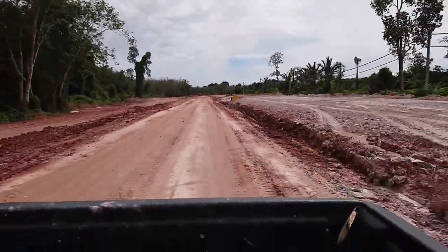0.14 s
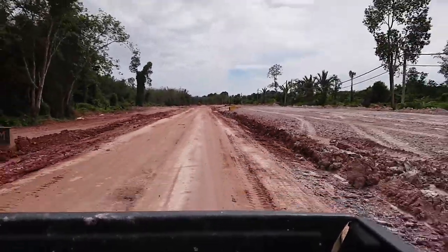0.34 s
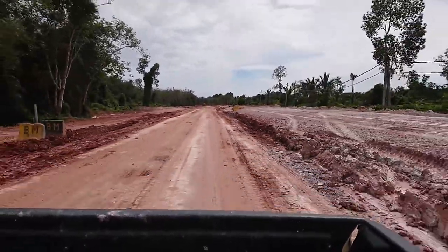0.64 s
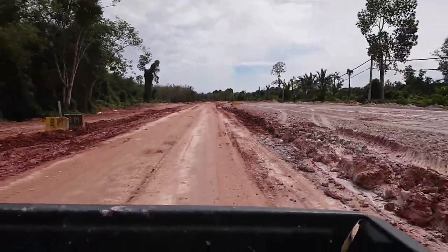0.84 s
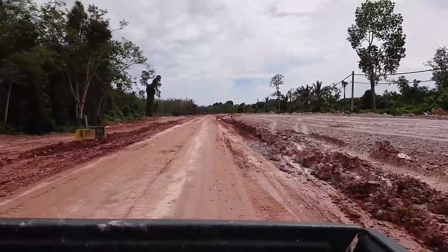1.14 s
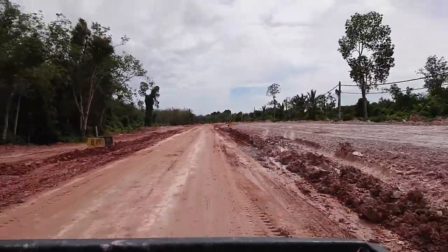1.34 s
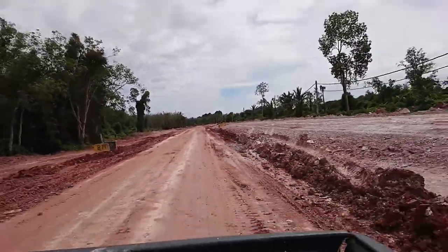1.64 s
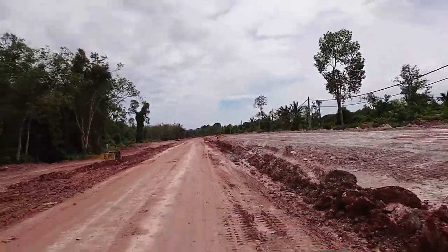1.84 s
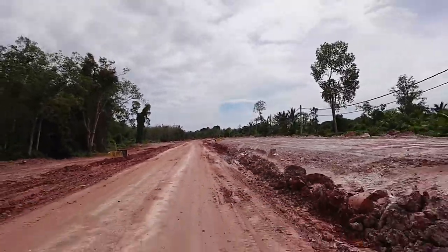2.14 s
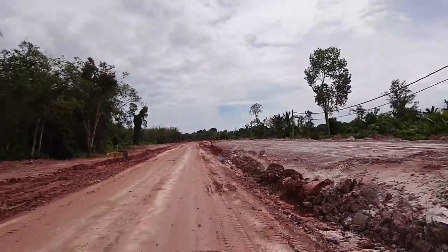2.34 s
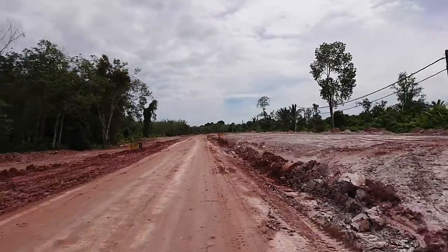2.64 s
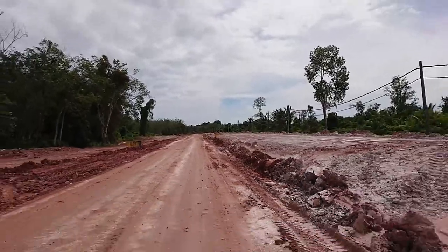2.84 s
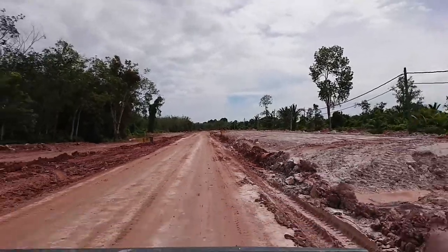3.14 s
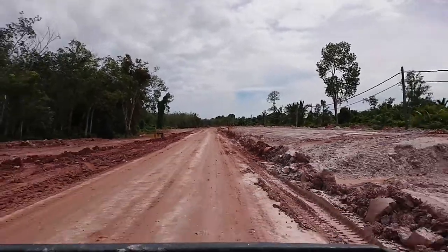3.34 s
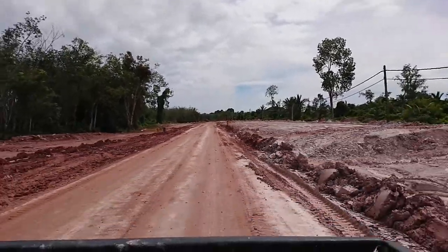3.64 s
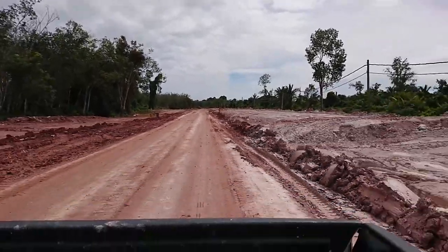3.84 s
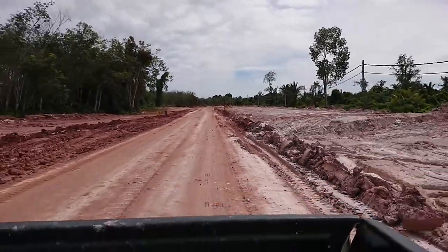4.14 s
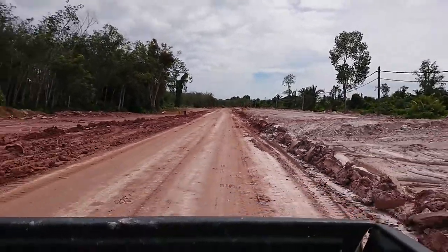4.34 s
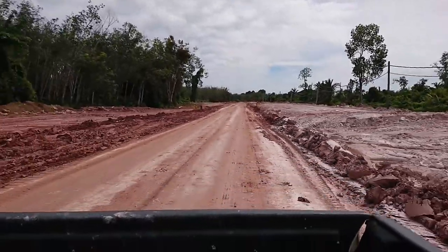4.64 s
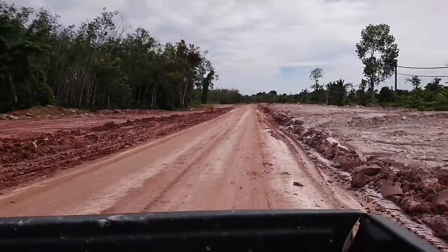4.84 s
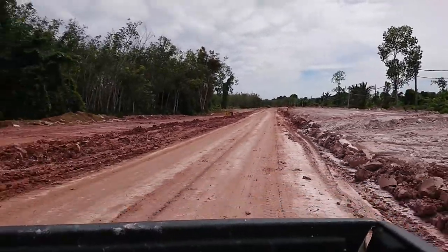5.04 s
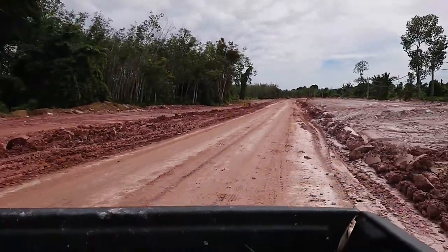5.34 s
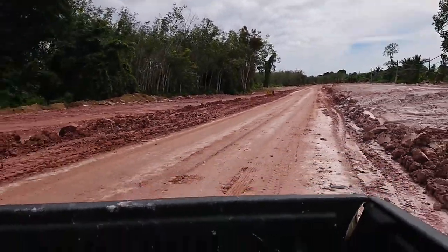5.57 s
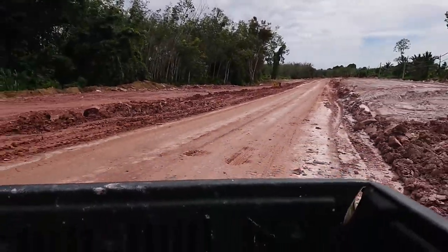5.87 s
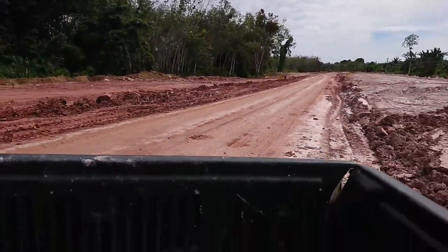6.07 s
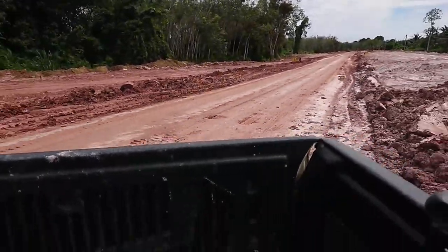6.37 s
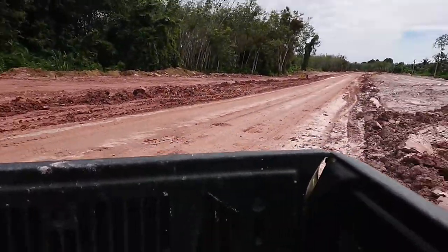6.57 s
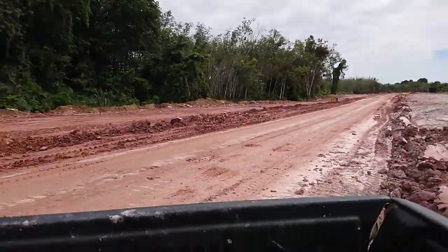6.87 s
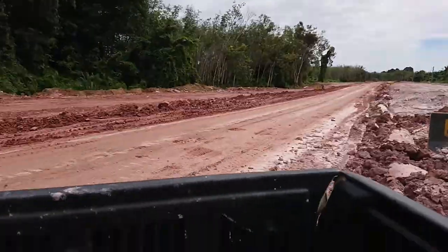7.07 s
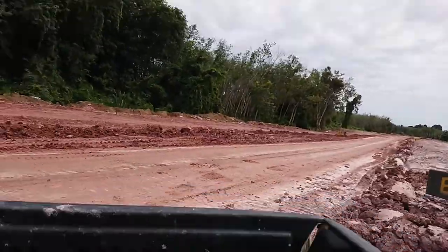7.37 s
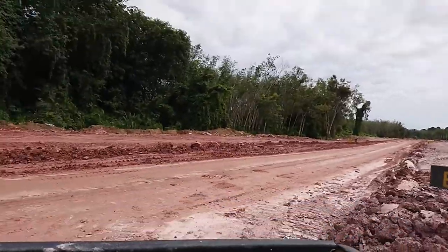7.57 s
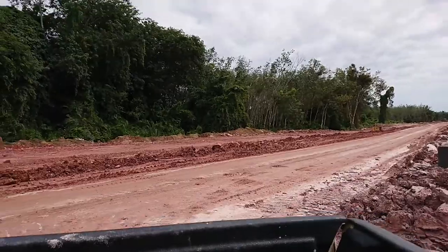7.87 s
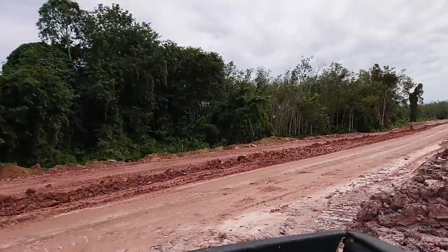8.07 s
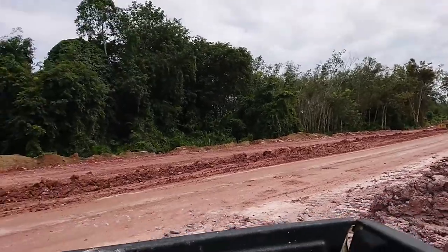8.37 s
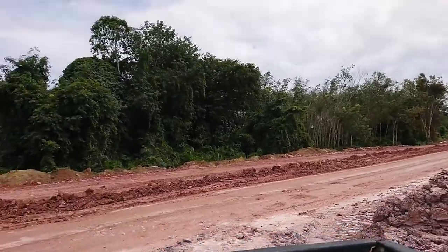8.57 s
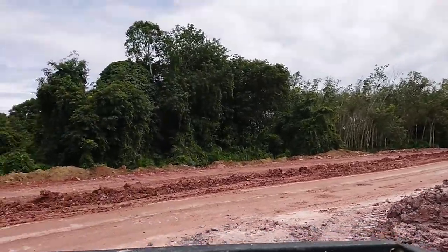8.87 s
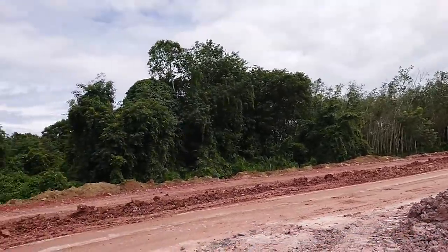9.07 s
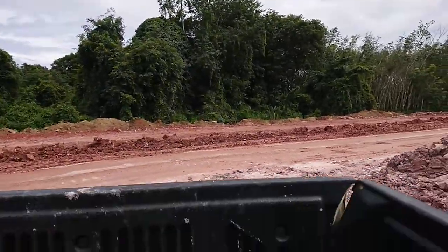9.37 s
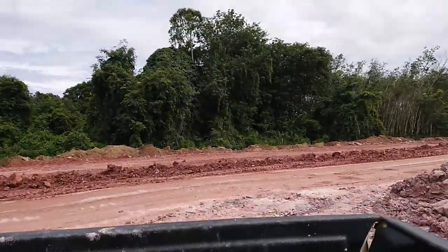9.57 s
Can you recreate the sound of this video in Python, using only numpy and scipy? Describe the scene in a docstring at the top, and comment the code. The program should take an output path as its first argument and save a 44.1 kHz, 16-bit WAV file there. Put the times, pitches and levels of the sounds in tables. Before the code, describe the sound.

Heard from the open load bed of a pickup on a dirt road. Strong wind flaps jump between left and right for over two seconds, then ease. Ruts make the body boom irregularly, tyres rumble and grit crunches and hisses. Stones clack on the underside, thin squeaks appear midway, and later jolts ring the bed with short hollow knocks. A faint engine hum runs beneath.

```python
"""A pickup on a dirt road, heard from its open load bed through two microphone ports.
First seconds: eddies flap hard at one port or the other over turbulence, then ease; ruts shake a booming body,
tyres rumble and throw grit, and stones strike the underside throughout. Engine, gear and turbo tones run below.
From 3 s thin squeals and scrapes are more frequent; from 6.6 s most of the jolts ring the bed's modes.
At 8.4 s a low drone swells once in the bend."""
import sys
import numpy as np
from scipy import signal
from scipy.fft import rfft, irfft, next_fast_len
from scipy.io import wavfile
from scipy.ndimage import uniform_filter1d, map_coordinates

SR = 44100
rng = np.random.default_rng(int(sys.argv[2]) if len(sys.argv) > 2 else 0)


def put_to_file(sound):
    """Save the sound as 16-bit audio at rate SR, in the file named by the first command-line argument."""
    columns = np.atleast_2d(sound).T  # one column per channel
    safe = np.clip(columns, -1, 1)
    whole_steps = np.round(safe * 32767)
    wavfile.write(sys.argv[1], SR, whole_steps.astype(np.int16))


N = 428211
LEFT, RIGHT = 0, 1

# Wind
# turbulence, falling with speed, right port gets into shelter: at_s, left_db, right_db
WIND_LEVELS = [(0, -23.5, -20), (.8, -20, -22.5), (1.5, -23.5, -17), (2.4, -20.5, -24.5), (3, -26, -30.5),
               (4.3, -26.5, -30.5), (5.8, -34, -38), (8.2, -32, -59), (9.71, -28, -50)]
# strong eddies, each at one port: at_s, port, level_db, top_hz
STRONG_EDDIES = [(.004, RIGHT, -9.5, 1990), (.015, RIGHT, -10.5, 1500), (.05, RIGHT, -12.5, 1500),
                 (.066, RIGHT, -11.5, 1700), (0.078, RIGHT, -12.5, 1300), (0.129, RIGHT, -17.5, 900),
                 (.17, LEFT, -20, 900), (0.1835, LEFT, -6, 1800), (.198, LEFT, -11, 895),
                 (.31, LEFT, -11, 1300), (.314, LEFT, -13.5, 1500), (.337, LEFT, -13, 1200),
                 (.415, RIGHT, -14.5, 1680), (.422, RIGHT, -9, 1500), (.469, RIGHT, -10, 880),
                 (.484, LEFT, -17, 1300), (0.571, LEFT, -7, 2300), (0.7337, RIGHT, -8, 1590),
                 (0.7412, RIGHT, -13.5, 1390), (0.756, RIGHT, -18, 800), (.782, RIGHT, -18.5, 900),
                 (0.84, RIGHT, -12, 2150), (0.848, RIGHT, -11.5, 1200), (.969, RIGHT, -13, 1360),
                 (.987, RIGHT, -14.5, 1100), (1.142, RIGHT, -13, 775), (1.154, LEFT, -9, 440),
                 (1.194, LEFT, -19.5, 1100), (1.291, RIGHT, -19, 1000), (1.306, RIGHT, -11, 510),
                 (1.368, LEFT, -14, 1000), (1.4004, LEFT, -8, 2020), (1.454, RIGHT, -14, 970),
                 (1.528, RIGHT, -10.5, 1440), (1.56, RIGHT, -13, 1757), (1.577, RIGHT, -16, 1000),
                 (1.597, RIGHT, -15, 1300), (1.676, RIGHT, -21, 795), (1.711, LEFT, -9, 701),
                 (1.717, RIGHT, -17.5, 1800), (1.787, RIGHT, -12.5, 1420), (1.796, RIGHT, -13, 2453),
                 (1.819, RIGHT, -19, 900), (1.94, LEFT, -14, 1001), (1.965, LEFT, -9, 520),
                 (1.978, LEFT, -16.5, 1600), (2.041, RIGHT, -12, 1210), (2.065, RIGHT, -17.5, 850),
                 (2.089, RIGHT, -18, 1000), (2.108, LEFT, -21, 1400), (2.14, RIGHT, -18.5, 1100),
                 (2.171, RIGHT, -19, 1000), (2.211, RIGHT, -14, 750), (2.311, RIGHT, -20, 1300),
                 (2.327, LEFT, -13.5, 1140), (2.381, RIGHT, -19, 796), (2.449, RIGHT, -15.5, 600),
                 (2.475, LEFT, -14.5, 650), (2.742, LEFT, -14.5, 1370), (3.005, RIGHT, -19, 950),
                 (3.194, LEFT, -13.5, 564), (3.716, RIGHT, -12.5, 750), (3.894, RIGHT, -11.5, 1210),
                 (4.057, LEFT, -12, 230), (4.153, LEFT, -12, 1350), (4.195, LEFT, -10.5, 750),
                 (4.232, LEFT, -8, 1090), (8.219, LEFT, -18.5, 580)]
# turbulence spectrum: freq_hz, relative_db (per Hz)
TURBULENCE_SPECTRUM = [(20, -27), (35, -12), (52, 8.5), (75, 0), (110, 0), (200, -8), (350, -14),
                       (600, -20), (1000, -34), (1500, -43), (2500, -97)]
# octave strengths in an eddy: freq_hz, relative_db
EDDY_OCTAVES = [(150, 2), (300, -2), (600, -5.5), (1200, -8.5), (2400, -18), (4800, -18.5)]
# colour a port gives an eddy: freq_hz, gain_db
PORT_RESPONSE = [(750, 0.5), (1000, -2.5), (1400, 1), (1750, -3), (2000, 0.5), (2400, 2), (3200, -1.5)]
# turbulence swell around an eddy, level relative to the eddy's, which counts only up to the limit
GUST_DB, GUST_RISE_S, GUST_FALL_S, GUST_LIMIT_DB = -8.5, 0.03, 0.047, -10
# weak eddies: rate at each port, level relative to the wind, median top frequency
EDDIES_PER_S, EDDY_OVER_WIND_DB, EDDY_TOP_HZ = 4, -0.5, 650
# eddies topping WHIP_HZ crack: dB per octave of tilt for each octave above it
WHIP_HZ, WHIP_DB = 1530, 3.5

# Drive line
# engine: at_s, firing_hz, hum_db (reference for the orders)
ENGINE_CURVE = [(0, 104, -31.5), (3, 107, -50.5), (4.6, 117, -39.5), (6.3, 117, -44.5), (7.4, 108, -41.5),
                (8.1, 109, -39), (8.7, 111, -36.5), (9.3, 112, -40), (9.71, 113, -35)]
# hum orders: multiple of the four-stroke cycle [-], relative_db
CYCLE_ORDERS = [(3, 2.5), (4, 4), (5, -3.5), (6, -22)]
# gear whine: at_s, pitch_hz, level_db
GEAR_CURVE = [(0, 426.3, -48.5), (4.8, 421.2, -52.5), (5.15, 419, -46.5), (5.4, 411, -45.5),
              (5.65, 421, -45), (6.2, 427, -47), (6.6, 410, -49), (7.1, 399, -63), (7.8, 392, -50),
              (8.6, 386.5, -51), (9.71, 377, -55)]
# turbo whistle: at_s, pitch_hz, level_db
TURBO_CURVE = [(0, 5880, -57), (2, 5990, -60), (4, 6030, -58.5), (5.2, 5930, -61.5), (6.3, 6060, -60.5),
               (7.3, 6080, -60.5), (8.8, 6088, -62.5), (9.71, 6100, -63)]
# drone in the bend
DRONE_AT_S, DRONE_HALF_S, DRONE_HZ = 8.4, 0.13, 42.7
# drone orders: multiple of DRONE_HZ [-], level_db
DRONE_PARTIALS = [(1, -31), (2, -25.5), (3, -28.5)]

# Loose parts and load bed
# squeaks, squeals, scrapes: at_s, pitch_hz, level_db, half_s, pitch_scatter [share]
SQUEAK_EVENTS = [(0.482, 1400, -45.5, 0.015, 0.018), (2.929, 3720, -39.5, 0.0029, 0.044),
                 (3.056, 12700, -60, .02, .025), (3.07, 14300, -60, .02, .025),
                 (3.308, 8420, -53, 0.011, .008), (3.315, 12400, -58, .016, .025),
                 (3.315, 14450, -60, .02, .025), (4.1, 15700, -61, .04, .009),
                 (4.4, 15600, -63, .026, .009), (4.55, 1430, -48, 0.014, 0.15),
                 (4.718, 8090, -59, .018, .005), (4.78, 15810, -60, .05, .009),
                 (5.11, 8030, -58, 0.024, .005), (5.13, 15750, -59, .042, 0.0074),
                 (5.555, 8070, -55, .011, .005), (5.615, 15700, -57, .025, .009),
                 (6.854, 8466, -43, .0012, 0.033), (6.945, 1840, -37, 0.0018, .06),
                 (7.05, 3730, -42, 0.0025, 0.085), (7.196, 1290, -45, .006, 0.16),
                 (8.466, 2580, -47, 0.025, 0.062)]
# jolts: at_s, level_db (reference for ring and crack), hardness_db_per_octave
JOLTS = [(3.647, -23, 7.5), (6.638, -19, -17), (6.7951, -12, -1), (6.937, -23, 7), (7.049, -28, 7),
         (7.077, -32.5, 0), (7.136, -12.5, -24), (7.152, -15.5, -22.5), (7.468, -22, -14), (7.559, -25, -6),
         (7.813, -16.5, -14.5), (8.219, -22.5, -7.5), (9.161, -36, 3), (9.646, -25.5, 7.5),
         (9.675, -27, -3)]
# load bed modes: freq_hz, relative_db, t60_s
BED_MODES = [(157, -10, 0.069), (208.2, -5, 0.075), (290, -11, 0.06), (446, -0.5, 0.07), (540, 2, 0.043),
             (660, 1.5, 0.042), (875, -10, 0.032), (967, -7, 0.03), (1278, -9, 0.039), (1576, -8, 0.019),
             (1910, -16, 0.027), (2585, -12, 0.025), (3880, -27, 0.017)]
# crack of a jolt: freq_hz, relative_db (per Hz)
CRACK_SPECTRUM = [(200, -12), (600, 2.5), (1500, -5), (2500, -9), (4500, -16.5), (7000, -29), (14000, -38)]

# Stones
# strikes on the underside: at_s, clack_db, tick_db (both before fixed offsets), left_minus_right_db (clack)
STONE_STRIKES = [(1.1, -44, -43, -6), (1.243, -46, -43, -8), (1.4415, -18.5, -18, -12),
                 (1.6195, -21, -26, -6), (1.656, -28, -41, -4), (2.885, -52, -44, -2),
                 (3.255, -30.5, -58, -8), (3.514, -29, -42.5, -4), (3.647, -18.5, -66, -1),
                 (3.659, -35, -66, -2), (3.7926, -46, -49, -1), (3.9458, -49, -52, -4),
                 (4.376, -38, -64, -5), (4.469, -36, -60, -4), (4.667, -37, -62, -2),
                 (4.962, -37.5, -52, -4), (5.003, -35.5, -52, -9), (5.1967, -32, -45, -8),
                 (5.444, -41, -46, -4), (5.8243, -34, -46, -6), (5.877, -38, -44.5, -9),
                 (5.9234, -36, -46, -8), (6.252, -41, -44, -2), (6.287, -32, -50, -6),
                 (6.561, -49, -55, -2), (6.662, -35, -54, -3), (6.706, -28.5, -56, -8),
                 (6.752, -34, -55, -3), (6.853, -39, -45, 0), (6.889, -31, -65, -1), (6.92, -46, -48, -3),
                 (6.9364, -48, -44, -4), (7.047, -31, -49, 4), (7.101, -34, -42, -8),
                 (7.1765, -33, -54, -2), (7.5627, -52, -47, -3), (7.6715, -42, -49, 1),
                 (8.1974, -18.5, -44.5, 1), (8.35, -36.5, -37.5, 1), (8.3834, -34, -44, -1),
                 (8.825, -33.5, -41.5, -3), (9.1601, -19, -42, -2), (9.38, -30, -36.5, -6),
                 (9.434, -38, -46, -2), (9.6451, -28, -48, -3)]
# panel clack: freq_hz, relative_db (per Hz)
CLACK_SPECTRUM = [(700, -19), (1400, -6), (2100, 9.5), (3100, 4.5), (4000, -5.5), (7000, -11.5),
                  (14000, -53)]
# stone tick: freq_hz, relative_db (per Hz)
TICK_SPECTRUM = [(1800, -33), (3400, 5), (4800, 4), (6500, 8), (8500, 3), (10500, -2), (15500, -15)]
# small stones: rate at mean dirt level, levels relative to the thrown dirt (before the strike offsets)
PEBBLES_PER_S, PEBBLE_CLACK_DB, PEBBLE_TICK_DB = 4, 1, -3.5

# Grit
# thrown dirt: at_s, dirt_db (reference for crunch, sand and pebbles)
DIRT_LEVEL = [(0.0, -46.5), (0.24, -50), (0.89, -51), (1.46, -46), (1.78, -51), (2.19, -52), (3.24, -47),
              (3.65, -46.5), (4.49, -53.5), (5.32, -50.5), (5.81, -53), (6.65, -50.5), (6.84, -48),
              (7.25, -55), (7.41, -53.5), (8.33, -52), (9.19, -54.5), (9.71, -48.5)]
CRUNCH_DB, SAND_DB = 8, -9  # relative to the thrown dirt
# clods bursting into sand: at_s, level_db, half_s
CLOD_SPRAYS = [(0.092, -37, 0.017), (1.137, -38.5, 0.021), (1.264, -44, 0.012), (1.351, -33.5, 0.015),
               (1.498, -43.5, .014), (2.539, -36.5, 0.015), (3.26, -44.5, 0.014), (3.582, -41.5, 0.012),
               (3.745, -48, 0.017), (5.217, -46.5, 0.02), (5.453, -54, 0.011), (5.84, -42.5, 0.016),
               (6.31, -49.5, 0.055), (6.714, -44, 0.059), (6.952, -54, 0.064), (7.341, -44.5, 0.0059),
               (8.093, -47.5, 0.024), (8.46, -52, .04), (9.514, -51, 0.022)]
# crunch under the treads: freq_hz, relative_db (per Hz)
CRUNCH_SPECTRUM = [(400, 11.5), (1000, 5.5), (1350, 6), (1650, 3), (2400, 3.5), (3300, -4), (4500, -11),
                   (6500, -12.5), (9000, -55)]
# sand hiss: freq_hz, relative_db (per Hz)
SAND_SPECTRUM = [(1500, -15), (4000, 2), (6500, 2.5), (8500, 0), (10700, -2.5), (11800, -16), (13000, -5.5),
                 (15500, -34)]
# spray: freq_hz, relative_db (per Hz)
SPRAY_SPECTRUM = [(800, 10.5), (2200, 10), (4500, 9), (8000, 5), (11000, -0.5), (15500, -11)]
# crunch balance: freq_hz, left_minus_right_db
CRUNCH_BALANCE = [(700, -1.5), (1300, -0.5), (2300, -7.5), (3200, -3), (4400, 12.5), (8000, 16)]
# sand balance: freq_hz, left_minus_right_db
SAND_BALANCE = [(4000, -6.5), (8000, -0.5), (11000, 0.5), (14000, -14)]

# Road
# ride between ruts, smoother as the truck slows for a bend: at_s, boom_db, rumble_db
RIDE_LEVELS = [(0, -27, -29), (.6, -23, -30.5), (1.4, -22, -27), (2.1, -26, -31), (2.62, -25.5, -35),
               (3.1, -23.5, -35), (3.5, -23, -28.5), (4.1, -19.5, -33), (4.35, -27, -35),
               (4.7, -24.5, -34.5), (5.3, -26.5, -31), (5.55, -23, -28.5), (5.9, -30, -32.5),
               (7.1, -27.5, -34), (7.7, -28.5, -34.5), (8.4, -25, -33.5), (9, -28.5, -42.5),
               (9.71, -24.5, -29)]
# ruts the wheels drop into: at_s, boom_db, rumble_db
RUT_HITS = [(.06, -16, -30.5), (.345, -25, -32), (.68, -30, -43), (1.03, -19, -28), (1.36, -18, -27),
            (1.42, -18, -26), (1.53, -35, -19.5), (1.71, -14.5, -26), (1.8, -17, -37), (2.07, -20, -25.5),
            (2.23, -21, -26), (2.37, -26, -39), (2.51, -22, -24), (2.68, -24, -46), (2.79, -17, -25),
            (2.94, -20.5, -29), (3.23, -18.5, -26), (3.38, -26, -57), (3.59, -15, -20.5),
            (3.655, -17.5, -24.5), (3.7, -30, -24), (4.01, -17.5, -33), (4.16, -14.5, -30),
            (4.24, -14.5, -38), (4.37, -16, -33), (4.48, -21.5, -43), (4.57, -27, -47), (4.91, -17, -35),
            (4.99, -21.5, -47), (5.17, -34, -30.5), (5.34, -26, -37), (5.43, -16.5, -37), (5.68, -32, -48),
            (5.9, -27, -50), (6.21, -19.5, -31), (6.39, -35, -33), (6.65, -23, -33), (7.02, -42, -28.5),
            (7.16, -23, -38), (7.47, -40, -26.5), (7.67, -24, -50), (7.88, -18.5, -32), (8.22, -34, -37),
            (8.95, -28, -37), (9.2, -22, -30.5), (9.64, -22, -35)]
RUT_RISE_S, RUT_FALL_S = 0.027, 0.035
# body boom: freq_hz, relative_db (per Hz), before the pitch shift
BOOM_SPECTRUM = [(20, -32), (32, -14.5), (42, -14), (52, -3), (67, 6.5), (82, -1.5), (100, -14.5),
                 (140, -28), (300, -91)]
# wandering boom: at_s, centre_hz
BOOM_CENTRE = [(0, 63), (.8, 66.93), (1.4, 64.12), (2.5, 68.1), (3.1, 63), (3.8, 67), (4.4, 63.06), (5, 68),
               (6.3, 67.16), (7.4, 68.9), (8.6, 71), (9.71, 66)]
BOOM_REST_HZ = 67.1
# tyre rumble: freq_hz, relative_db (per Hz)
TYRE_SPECTRUM = [(40, -36), (90, 2), (140, 0.5), (200, -1.5), (300, -6.5), (430, -14), (600, -20),
                 (1000, -27), (1500, -53), (3000, -68)]
# likeness of road noise at the ports: freq_hz, coherence [-1..1]
PORT_COHERENCE = [(60, 0.4), (120, 0.99), (240, 0.95), (480, 0.82), (950, -0.16), (1890, -0.33),
                  (3770, 0.12), (7520, -0.44), (15000, 0.02)]

TOP_HZ = 15800  # band limit


def amp(db):
    """Decibels to gain."""
    return 10 ** (np.asarray(db) / 20)


def unit(x):
    """Scaled to rms 1."""
    return x / np.sqrt(np.mean(x ** 2) + 1e-20)


def along(points, hz):
    """Interpolates (Hz, value) points on a log axis."""
    f, v = np.transpose(points)
    return np.interp(np.log(hz + 1), np.log(f + 1), v)


def curves(rows):
    """One value per sample for each column after the time."""
    s, *cols = np.transpose(rows)
    return [np.interp(np.arange(N) / SR, s, c) for c in cols]


def wobble(rate):
    """Smooth random curve, rate knots a second."""
    knots = rng.standard_normal(int(N * rate / SR) + 4)
    return map_coordinates(knots, [np.arange(N) * rate / SR], mode="nearest")


def swell(s, rise_s, fall_s):
    """Smooth hump of height 1 peaking at time s."""
    t = np.arange(N) / SR - s
    near = np.abs(t) < 5 * max(rise_s, fall_s)
    hump = np.zeros(N)
    hump[near] = np.exp(-(t[near] / np.where(t[near] < 0, rise_s, fall_s)) ** 2 / 2)
    return hump


def filtered(x, response):
    """Applies a gain given as a function of Hz."""
    n = x.shape[-1]
    m = next_fast_len(n + 4096)
    return irfft(rfft(x, m) * response(np.fft.rfftfreq(m, 1 / SR)), m)[..., :n]


def coloured(x, spectrum):
    """Shapes x with a spectrum, to rms 1."""
    return unit(filtered(x, lambda hz: amp(along(spectrum, hz))))


def sides(lean_db):
    """Left and right gains for a left-right difference."""
    return amp(np.array([[1], [-1]]) * lean_db / 2)


def pair(alike):
    """Two white noises with a given likeness."""
    share = np.clip(alike, 0, 1)
    return np.sqrt(share) * rng.standard_normal(N) + np.sqrt(1 - share) * rng.standard_normal((2, N))


def at_ports(x):
    """Mixes two unrelated noises to the ports' coherence at each frequency."""
    turn = lambda hz: np.arccos(np.clip(along(PORT_COHERENCE, hz), -1, 1)) / 2
    mid, side = filtered(x, lambda hz: np.array([np.cos(turn(hz)), np.sin(turn(hz))]))
    return np.array([mid + side, mid - side])


def add(track, s, sound):
    """Mixes a short sound in from time s."""
    start = round(s * SR)
    part = sound[..., max(-start, 0):max(N - start, 0)]
    track[..., max(start, 0):max(start, 0) + part.shape[-1]] += part


def grains(rate, spread_db):
    """Tiny impacts of scattered size, rate per second, with independent strength at each port."""
    hit = rng.random(N) < rate / SR
    size = amp(spread_db * np.minimum(rng.exponential(size=N), 4))
    return unit(hit * size * rng.standard_normal((2, N)))


def tone(hz, drift, rate):
    """Sine of rms 1 with unsteady pitch."""
    phase = 2 * np.pi * np.cumsum(hz * (1 + drift * wobble(rate))) / SR
    return np.sqrt(2) * np.sin(phase)


def patchy(x, depth_db, width_hz, length_s):
    """Gives x random swells, each over a narrow band and a short time."""
    z = signal.stft(x, nperseg=512)[2]
    band = np.arange(z.shape[1]) * SR / 512 / width_hz
    frame = np.arange(z.shape[2]) * 256 / SR / length_s
    grid = np.meshgrid(band, frame, indexing="ij")
    field = map_coordinates(rng.standard_normal((256, 1024)), grid, order=1, mode="wrap")
    return unit(signal.istft(z * amp(depth_db * unit(field)), nperseg=512)[1][:, :N])


def between_walls(x, echo_db=-4, t60_s=0.031):
    """The close walls of the bed smear each tiny impact and ripple its spectrum."""
    t = np.arange(SR // 30) / SR
    echo = rng.standard_normal((2, len(t))) * amp(-60 * t / t60_s)
    echo *= amp(echo_db) / np.linalg.norm(echo, axis=1, keepdims=True)
    return unit(x + signal.fftconvolve(x, echo, axes=1)[:, :N])


def wind(lumpy_db=5.0):
    """Lumpy turbulence, unrelated at the two ports, swelling around each strong eddy."""
    power = amp(curves(WIND_LEVELS)) ** 2
    for s, port, db, top_hz in STRONG_EDDIES:
        gust = amp(min(db, GUST_LIMIT_DB) + GUST_DB) * swell(s, GUST_RISE_S, GUST_FALL_S)
        power[port] += gust ** 2
    ports = []
    for port_power in power:
        noise = coloured(rng.standard_normal(N), TURBULENCE_SPECTRUM)
        ports.append(noise * np.sqrt(port_power) * unit(amp(lumpy_db * wobble(30))))
    return np.array(ports)


def weak_eddies(scatter_db=2, scatter_octaves=0.66):
    """Eddies at random moments, their level following the wind at their port."""
    rows = []
    for port, wind_db in enumerate(curves(WIND_LEVELS)):
        at = np.flatnonzero(rng.random(N) < EDDIES_PER_S / SR)
        for i, (size, height) in zip(at, rng.standard_normal((len(at), 2))):
            level_db = wind_db[i] + EDDY_OVER_WIND_DB + scatter_db * size
            rows.append((i / SR, port, level_db, EDDY_TOP_HZ * 2 ** (scatter_octaves * height)))
    return rows


def buffets(life_s=0.0061, shrink=0.85, quicken=0.089):
    """Each eddy gives one rough flap at one port, shorter if brighter, its higher octaves only at the crest."""
    out, t = np.zeros((2, N)), np.arange(-2048, 2048) / SR
    centres_hz = 150 * 2. ** np.arange(6)[:, None]
    octave = np.log2(centres_hz / centres_hz[0])
    split = lambda hz: np.cos(np.pi / 2 * np.clip(np.log2((hz + 1) / centres_hz), -1, 1))
    for s, port, db, top_hz in STRONG_EDDIES + weak_eddies():
        band_life_s = life_s * (EDDY_TOP_HZ / top_hz) ** quicken * 2 ** (-shrink * octave)
        bands = filtered(rng.standard_normal(len(t)), split)
        bands = bands / np.cosh(np.clip(t / band_life_s, -20, 20))
        bands = bands / np.linalg.norm(bands, axis=1, keepdims=True)
        tilt_db = WHIP_DB * max(np.log2(top_hz / WHIP_HZ), 0)
        flap = np.sum(bands * amp(along(EDDY_OCTAVES, centres_hz) + tilt_db * octave), axis=0)
        # steep loss above the eddy's top frequency
        flap = filtered(flap, lambda hz: amp(along(PORT_RESPONSE, hz)) / np.sqrt(1 + (hz / top_hz) ** 6))
        # level: flap energy spread over 6 ms
        add(out[port], s + t[0], amp(db) * np.sqrt(.006 * SR) * flap / np.linalg.norm(flap))
    return out


def drive_line():
    """Uneven engine hum at cycle multiples, gear whine and fuzzy turbo whistle: sines of unsteady pitch."""
    firing_hz, hum_db = curves(ENGINE_CURVE)
    gear_hz, gear_db = curves(GEAR_CURVE)
    turbo_hz, turbo_db = curves(TURBO_CURVE)
    cycle_hz = firing_hz / 4
    hum = np.zeros(N)
    for order, db in CYCLE_ORDERS:
        partial = tone(round(order) * cycle_hz, drift=0.01973, rate=14)
        hum += partial * amp(hum_db + db + 0.86 * wobble(9.6))
    whine = tone(gear_hz, drift=0.003, rate=12) * amp(gear_db + 0.98 * wobble(6.6))
    whistle = np.array([tone(turbo_hz, drift=0.007, rate=280) * amp(turbo_db + 1.5 * wobble(45))
                        for port in range(2)])
    return hum + whine + whistle * sides(lean_db=1.1)


def drone(drift=0.011):
    """Low harmonic tones swell and fade once as the truck takes the bend."""
    hum = np.zeros(N)
    for order, db in DRONE_PARTIALS:
        hum += tone(np.full(N, round(order) * DRONE_HZ), drift, rate=7.9) * amp(db)
    return hum * swell(DRONE_AT_S, DRONE_HALF_S, DRONE_HALF_S) * sides(lean_db=4.0)


def squeaks():
    """Fittings rub and sing for a moment; rough contacts smear the pitch."""
    out, t = np.zeros(N), np.arange(N) / SR
    slip = wobble(700)
    for s, hz, db, half_s, scatter in SQUEAK_EVENTS:
        near = np.abs(t - s) < 4 * half_s
        phase = 2 * np.pi * np.cumsum(hz * (1 + scatter * slip[near])) / SR
        hump = np.exp(-((t[near] - s) / half_s) ** 2 / 2)
        out[near] += np.sqrt(2) * amp(db) * hump * np.sin(phase)
    return out


def knocks(ring_db=4, crack_db=-10.0, crack_t60_s=0.07):
    """Jolts excite the bed's modes and a crack; soft ones favour low modes, hard ones high."""
    out, t = np.zeros((2, N)), np.arange(SR // 5) / SR
    attack = 1 - np.exp(-t / .0005)
    for s, db, hardness in JOLTS:
        ring = np.zeros((2, len(t)))
        for hz, level_db, t60_s in BED_MODES:
            mode_db = level_db + hardness * np.log2(hz / 500) + rng.normal(0, 1.5)
            phase = 2 * np.pi * (hz * t + rng.random()) + rng.normal(0, .4, (2, 1))
            ring += amp(mode_db - 60 * t / t60_s) * np.sin(phase)
        # only hard jolts tilt the crack up; soft ones weaken it
        colour = [(hz, level_db + max(hardness, 0) * np.log2(min(hz, 1500) / 500))
                  for hz, level_db in CRACK_SPECTRUM]
        crack = coloured(rng.standard_normal((2, len(t))), colour)
        crack *= amp(crack_db + 1.2 * min(hardness, 0) - 60 * t / crack_t60_s)
        add(out, s, amp(db) * attack * (amp(ring_db) * ring / np.abs(ring).max() + crack))
    return out


def pebbles(scatter_db=3, crowding=1.5):
    """Small stones at random moments: the more dirt is thrown, the more and the stronger."""
    dirt_db, = curves(DIRT_LEVEL)
    per_s = PEBBLES_PER_S * amp(crowding * (dirt_db - dirt_db.mean()))
    at = np.flatnonzero(rng.random(N) < per_s / SR)
    levels_db = dirt_db[at, None] + [PEBBLE_CLACK_DB, PEBBLE_TICK_DB]
    levels_db = levels_db + scatter_db * rng.standard_normal((len(at), 2))
    return [(i / SR, clack_db, tick_db, -3) for i, (clack_db, tick_db) in zip(at, levels_db)]


def stones(t60_s=0.032, tail_db=-20, tail_t60_s=0.11, rise_s=0.0015):
    """Each stone gives a dense, quickly dying clack of the panel and a hard tick of its own."""
    out, t = np.zeros((2, N)), np.arange(SR // 6) / SR
    decay = amp(-60 * t / t60_s) + amp(tail_db - 60 * t / tail_t60_s)
    envelope = (1 - np.exp(-t / rise_s)) * decay
    for s, clack_db, tick_db, lean_db in STONE_STRIKES + pebbles():
        clack = amp(clack_db - 3.5) * coloured(rng.standard_normal((2, len(t))), CLACK_SPECTRUM)
        tick = amp(tick_db + 6.5) * coloured(rng.standard_normal((2, len(t))), TICK_SPECTRUM)
        add(out, s - .0005, (clack * sides(lean_db) + tick) * envelope)
    return out


def grit():
    """Dirt crunches under the treads in fluttering clumps; sand hisses in the wheel arches and bursts from clods."""
    dirt_db, = curves(DIRT_LEVEL)
    clumps = wobble(35)
    crunch = at_ports(rng.standard_normal((2, N)) + 0.74 * grains(rate=1800, spread_db=3.0))
    crunch = coloured(patchy(crunch, depth_db=2.0, width_hz=331.5, length_s=0.03), CRUNCH_SPECTRUM)
    crunch = filtered(crunch, lambda hz: sides(along(CRUNCH_BALANCE, hz)))
    crunch = crunch * amp(dirt_db + CRUNCH_DB + 1.56 * clumps)
    sand = between_walls(pair(.03) + .6 * grains(rate=2500, spread_db=2.5))
    sand = filtered(coloured(sand, SAND_SPECTRUM), lambda hz: sides(along(SAND_BALANCE, hz)))
    sand = sand * amp(dirt_db + SAND_DB + 2.0 * clumps)
    bursts = sum(amp(db) * swell(s, half_s, half_s) for s, db, half_s in CLOD_SPRAYS)
    spray = coloured(between_walls(pair(0.033) + grains(rate=3200, spread_db=4.5)), SPRAY_SPECTRUM)
    return crunch + sand + bursts * spray


def road(uneven_db=1.5):
    """Ruts shake the body's low resonance; the tyres rumble above it."""
    boom_db, tyre_db = curves(RIDE_LEVELS)
    boom_power = amp(boom_db + uneven_db * wobble(14)) ** 2
    tyre_power = amp(tyre_db) ** 2
    for s, rut_boom_db, rut_tyre_db in RUT_HITS:
        shake = swell(s, RUT_RISE_S, RUT_FALL_S)
        boom_power += (amp(rut_boom_db) * shake) ** 2
        tyre_power += (amp(rut_tyre_db) * shake) ** 2
    centre_hz, = curves(BOOM_CENTRE)
    shift = np.exp(2j * np.pi * np.cumsum(centre_hz - BOOM_REST_HZ) / SR)
    sway = signal.hilbert(coloured(rng.standard_normal(N), BOOM_SPECTRUM)) * shift
    # level out chance swings, so that the ride mostly sets their size
    sway_power = np.abs(uniform_filter1d(np.abs(sway) ** 2, size=2500))
    boom = unit(sway.real / np.sqrt(sway_power + 0.11))
    tyres = patchy(at_ports(rng.standard_normal((2, N))), depth_db=2, width_hz=125.6, length_s=0.05)
    tyres = coloured(tyres, TYRE_SPECTRUM) * amp(1.26 * wobble(22))
    return boom * np.sqrt(boom_power) * sides(lean_db=4.0) + tyres * np.sqrt(tyre_power)


def scene():
    """Wind at the two ports and the truck on the road."""
    air = wind() + buffets()
    truck = drive_line() + drone() + squeaks() + knocks()
    return air + truck + stones() + grit() + road()


def record(dry):
    """Cuts the deepest bass, rounds off the highest peaks and band-limits."""
    x = filtered(dry, lambda hz: 1 - 1 / (1 + (hz / 34.0) ** 5))
    x = x / (1 + np.abs(x / .88) ** 8) ** (1 / 8)
    return filtered(x, lambda hz: 1 / (1 + (hz / TOP_HZ) ** 400))


dry = scene()
out = record(dry)
put_to_file(out)
```